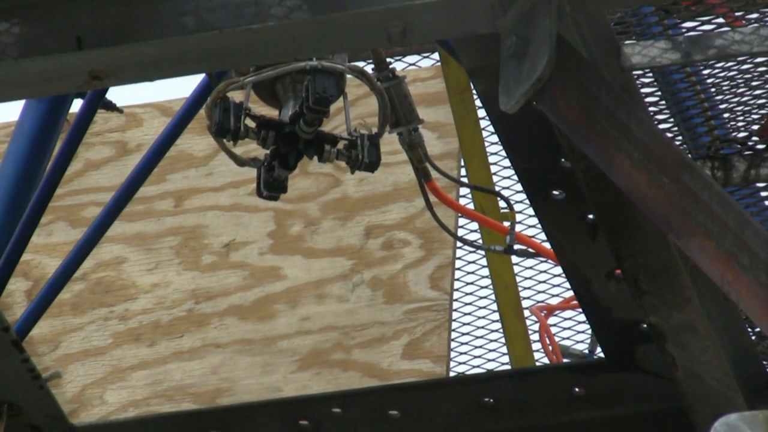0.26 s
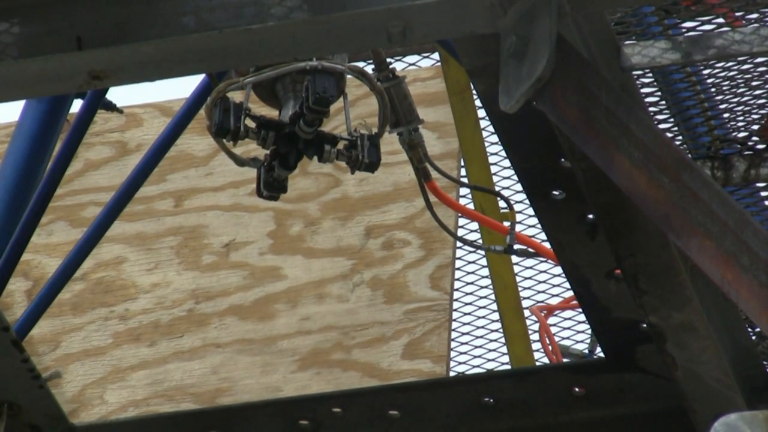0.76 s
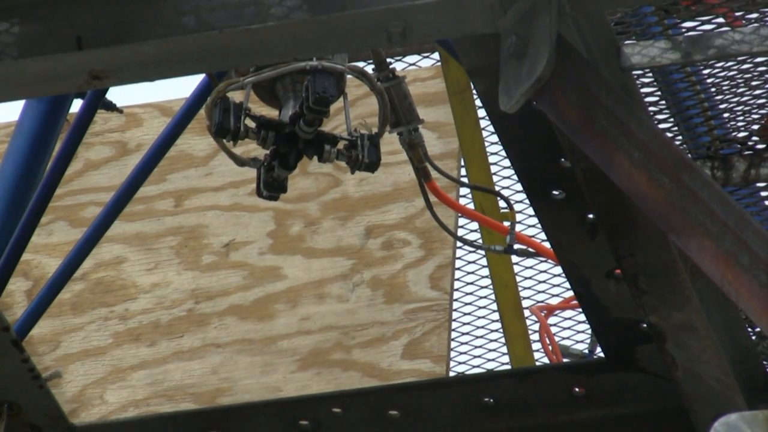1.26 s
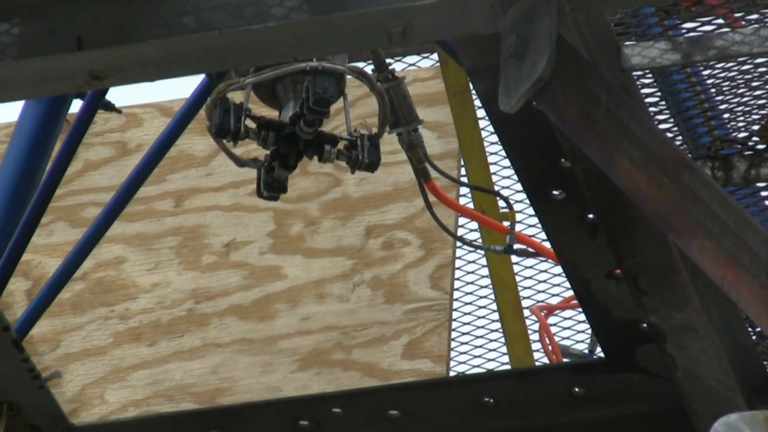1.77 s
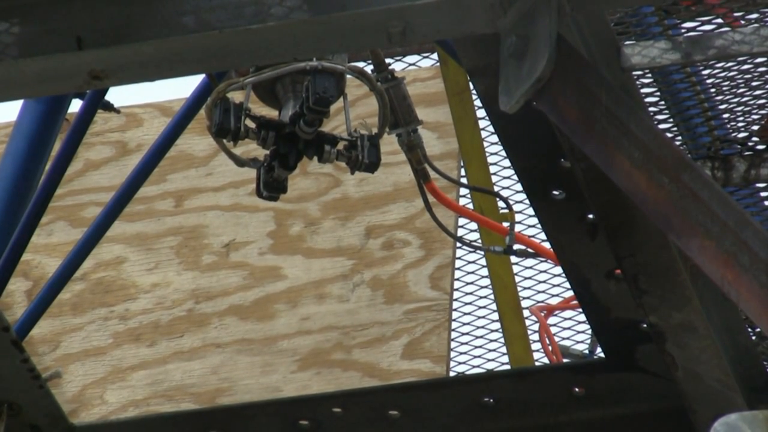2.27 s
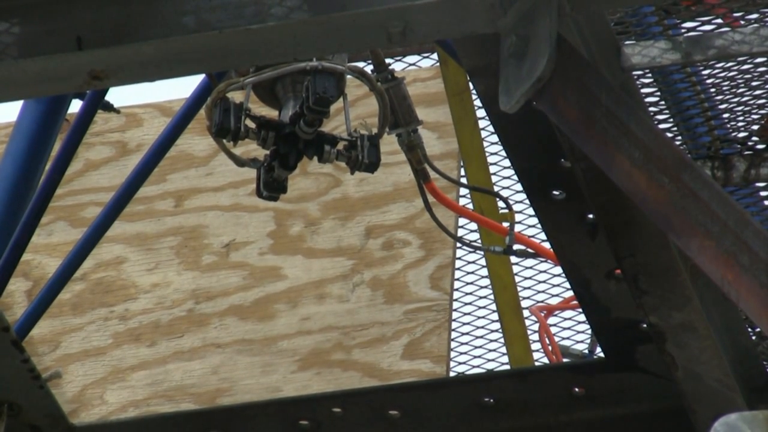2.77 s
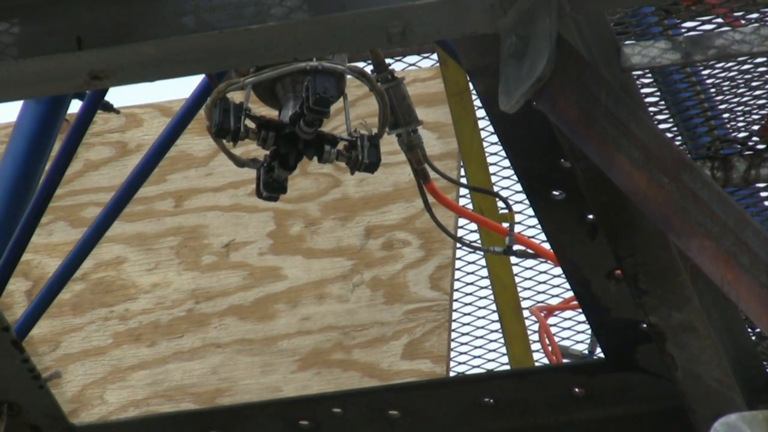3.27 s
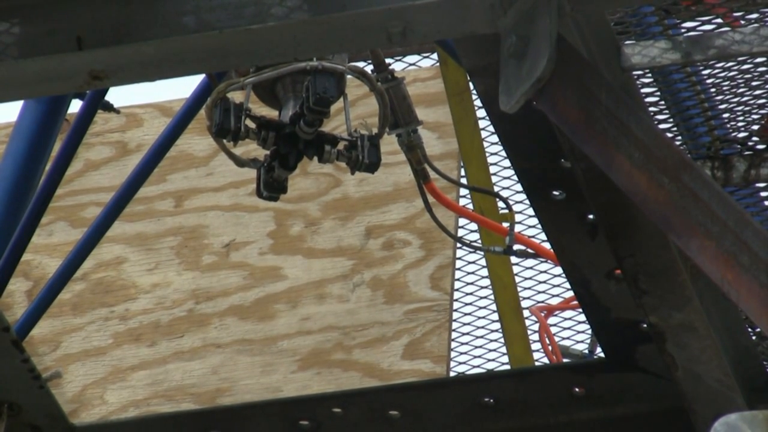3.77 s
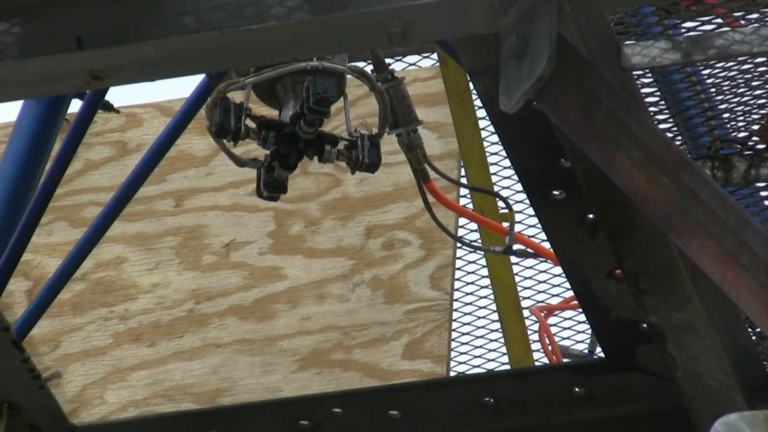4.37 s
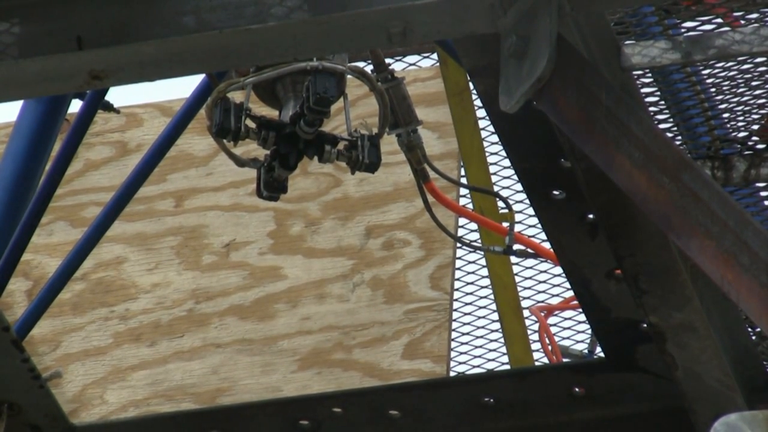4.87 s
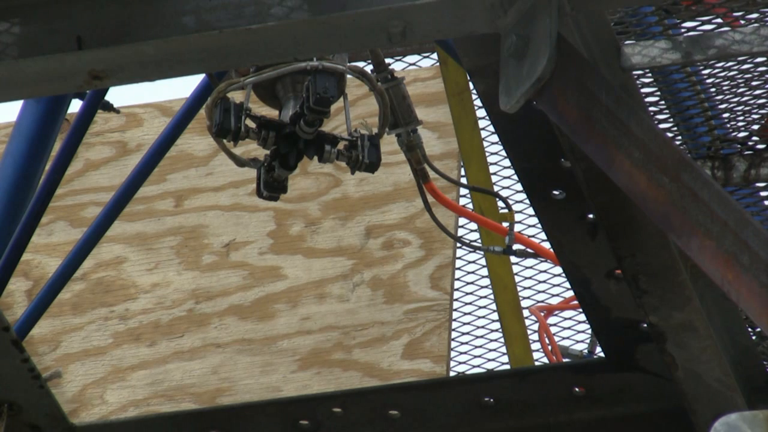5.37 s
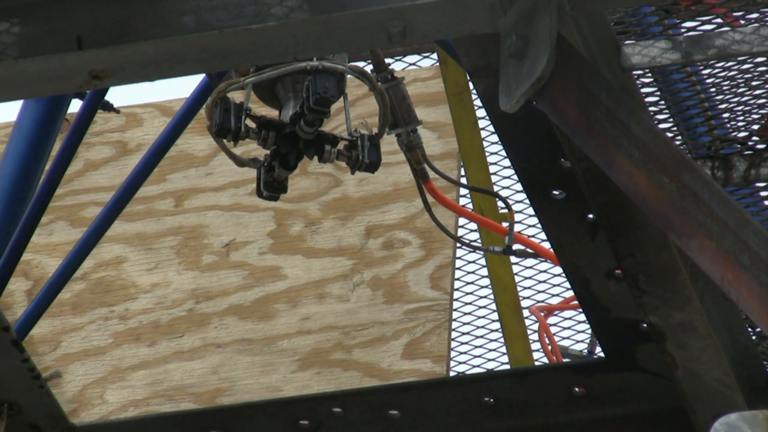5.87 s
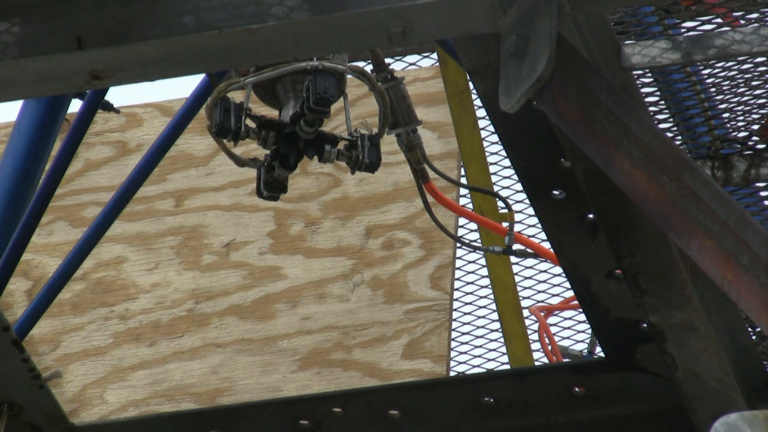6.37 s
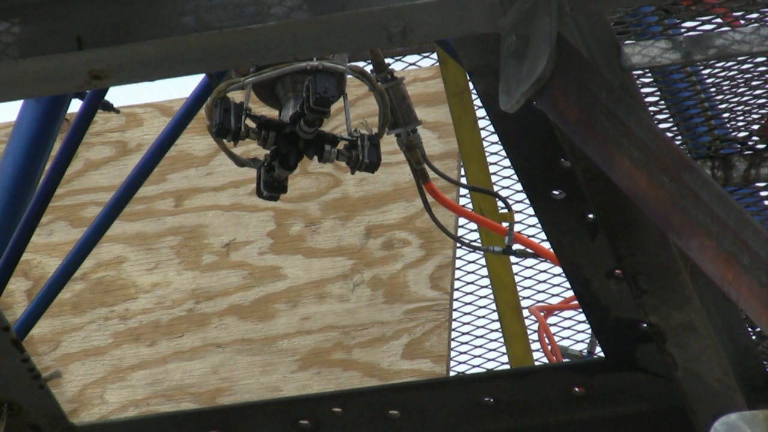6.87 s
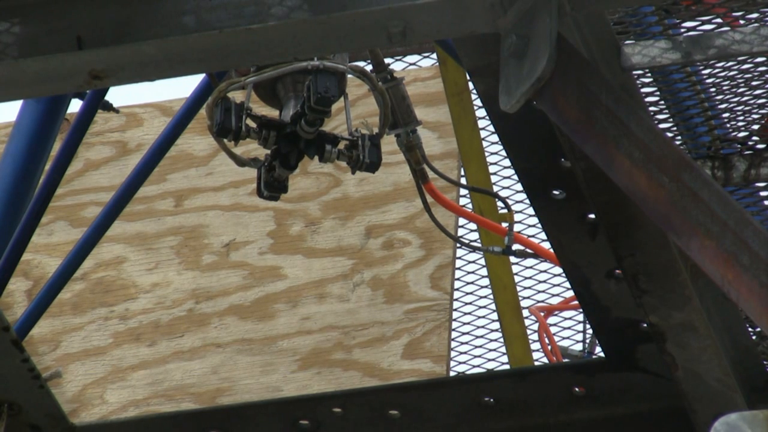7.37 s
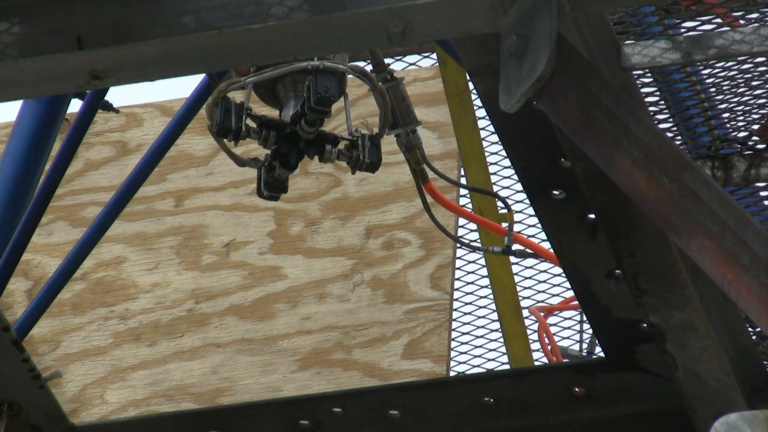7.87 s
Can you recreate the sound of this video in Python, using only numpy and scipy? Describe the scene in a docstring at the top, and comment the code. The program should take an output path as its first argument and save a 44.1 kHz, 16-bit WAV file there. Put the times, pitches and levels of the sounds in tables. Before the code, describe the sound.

A small rocket thruster roars and hisses close by, fades and shuts off, then relights with a pop and a rising screech.

```python
"""A small gas thruster on a steel and plywood stand burns close by and overdrives the microphone amplifier.
After two seconds it runs down, and short bursts of high hiss flicker over the fading roar.
At 5.7 s the valve shuts and the gas left in the line hisses out.
In the pause the frame gives soft valve thumps while mains hum, yard noise and a far hiss come up.
At 7.1 s the jet relights with a pop, and a rising screech joins its roar and shock-cell shriek."""
import sys
import numpy as np
from scipy import signal
from scipy.fft import rfft, irfft, next_fast_len
from scipy.io import wavfile
from scipy.ndimage import uniform_filter1d, map_coordinates

SR = 44100
rng = np.random.default_rng(int(sys.argv[2]) if len(sys.argv) > 2 else 0)


def unload_audio(sound):
    """Save the sound as a 16-bit wav file, at the path given as the first command line argument."""
    columns = np.transpose(np.atleast_2d(sound))
    # keep every value between -1 and 1, then stretch to whole-number steps
    steps = np.round(np.clip(columns, -1, 1) * 32767)
    wavfile.write(sys.argv[1], SR, steps.astype(np.int16))


N = 357648

# Swell of the background. Each row: time in seconds, share of the rise from 0 to 1.
SWELL = [(5.5, 0.03), (5.95, 0.3), (6.3, .55), (6.6, .82), (6.9, 1), (7.12, .85)]
# Outdoor sound at the two ports. Each row: frequency in Hz, left-right coherence.
YARD_COHERENCE = [(60, 0.49), (130, 0.07), (290, 0.5), (640, 0.72), (1410, 0.66), (3100, 0.39),
                  (6820, 0.36), (15000, 0.27)]
# Its balance. Each row: frequency in Hz, left minus right in dB.
YARD_PAN = [(60, -6.5), (110, -6), (200, -9), (380, -9), (700, -10.5), (1290, -8.5), (2380, -3.5),
            (4400, -4), (8120, -2.5), (15000, -1.5)]
# The two burns. Each row: valve opening and shutting times in seconds.
BURNS = [(-1, 5.73), (7.1215, 9)]
# The relight pop: start in seconds, level in dB, frequency in Hz, 60 dB decay time in seconds.
POP = (7.1254, 18, 290, .015)
# Phase between left and right for the jet layers; the left swings well ahead around 8 kHz. Each row: frequency
# in Hz, lead of the left in radians.
JET_LEAD = [(0, 0), (2840, 0.16), (3190, 0.25), (5770, -0.2), (6290, 0.3), (6800, -0.1), (7240, -0.3),
            (7920, 1.3), (8610, 2.0), (9650, 1.1), (10600, 1.1), (12900, 0.076), (15300, -0.054)]
# Response after the amplifier. Each row: frequency in Hz, gain in dB.
MIC_RESPONSE = [(30, -9), (150, -1), (500, -0.5), (4500, -1.5), (6500, -3), (8500, -4.5), (10500, 2),
                (16000, -6.5)]


def amp(db):
    """Amplitude ratio of a level in decibels."""
    return 10 ** (np.asarray(db) / 20)


def unit(x):
    """Normalisation to an rms of 1."""
    return x / np.sqrt(np.mean(x ** 2) + 1e-20)


def along(points, hz):
    """Interpolation of (Hz, value) points on a logarithmic frequency axis."""
    freqs, values = np.transpose(points)
    return np.interp(np.log(hz + 1), np.log(freqs + 1), values)


def envelope(points):
    """Linear interpolation of (seconds, value) points at every sample."""
    return np.interp(np.arange(N) / SR, *np.transpose(points))


def wobble(rate):
    """Slow random modulation: a spline through rate Gaussian knots a second."""
    return map_coordinates(rng.standard_normal(int(N * rate / SR) + 4), [np.arange(N) * rate / SR])


def filtered(x, response):
    """Linear filtering: the spectrum of x times a complex function of frequency."""
    size = next_fast_len(N + SR // 4)
    return irfft(rfft(x, size) * response(np.fft.rfftfreq(size, 1 / SR)), size)[..., :N]


def rush(spectrum, coherence, pan, lead, patchy_db):
    """Partially coherent stereo noise of rms 1, its gain fluctuating in patches of time and frequency."""
    def mid_side(hz):
        angle = np.arccos(np.clip(along(coherence, hz), -1, 1)) / 2
        return np.array([np.cos(angle), np.sin(angle)])

    def ports(hz):
        half = np.array([[.5], [-.5]])
        db = along(spectrum, hz) - along(MIC_RESPONSE, hz) + half * along(pan, hz)
        return amp(db) * np.exp(1j * half * along(lead, hz))

    cells = signal.stft(rng.standard_normal((2, N)), nperseg=512)[2]
    patches = uniform_filter1d(rng.standard_normal(cells.shape[1:]), size=6, axis=0)
    patches = uniform_filter1d(patches, size=12, axis=1)
    pair = signal.istft(cells * amp(patchy_db * unit(patches)), nperseg=512)[1][:, :N]
    mid, side = filtered(pair, mid_side)
    return unit(filtered(np.array([mid + side, mid - side]), ports))


def yard():
    """Ambient noise: a low broadband bed and the modulated tones of a far machine swell together."""
    # Each row: frequency in Hz, relative spectral density in dB.
    spectrum = [(20, -7), (66, -6.5), (178, -6), (314, -10.5), (370, -7), (470, -9.5), (540, -5.5),
                (640, -12.5), (870, -13), (1270, -15), (1700, -18.5), (2500, -29), (5000, -38.5)]
    # Each row: frequency in Hz, level in dB at the top of the swell.
    machine_tones = [(360.7, -60), (522.2, -56), (753.7, -58), (866.7, -60)]
    t = np.arange(N) / SR
    low_db, top_db = -58, -42.5
    noise = rush(spectrum, YARD_COHERENCE, YARD_PAN, lead=[(1000, .1)], patchy_db=1.2)
    machine = sum(amp(db + 3 * wobble(8.3)) * np.sin(2 * np.pi * hz * t + 1.2 * wobble(14))
                  for hz, db in machine_tones)
    return amp(low_db + (top_db - low_db) * envelope(SWELL)) * (noise + machine / amp(top_db))


def far_hiss():
    """Broadband noise: a smooth, distant hiss rises in the pause."""
    # Each row: frequency in Hz, relative spectral density in dB.
    spectrum = [(1200, -25.5), (2200, -4.5), (3800, -4), (4600, 0), (5800, -0.5), (7000, -4.5),
                (9000, -4.5), (16000, -10)]
    # Each row: time in seconds, level in dB.
    rise = [(6.15, -71.5), (6.6, -51), (7.12, -51)]
    noise = rush(spectrum, YARD_COHERENCE, YARD_PAN, lead=[(1000, .1)], patchy_db=.6)
    return amp(envelope(rise)) * noise


def mains_hum():
    """Harmonics: the mains frequency and its octave waver and swell until the relight."""
    # Each row: frequency in Hz, relative level in dB.
    harmonics = [(59.4, 3), (118.8, -13.5)]
    t = np.arange(N) / SR
    low_db, top_db = -59, -31
    hum = sum(amp(db + .8 * wobble(5)) * np.sin(2 * np.pi * hz * t + .3 * wobble(6))
              for hz, db in harmonics)
    before_relight = t < BURNS[1][0]
    return before_relight * amp(low_db + (top_db - low_db) * envelope(SWELL)) * hum * amp([[-4], [2.5]])


def knocks():
    """Damped vibration: valve thumps and the relight pop ring the frame briefly; a noise burst ticks."""
    # Each row: start in seconds, level in dB, frequency in Hz, 60 dB decay time in seconds.
    thumps = [(5.95, -40, 60, .08), (6.125, -28, 137.6, 0.054), (6.26, -25, 100, .06),
              (6.516, -29.5, 100, .05), (6.978, -8, 90.3, .065)]
    # Each row: start in seconds, level in dB.
    ticks = [(6.838, -42.5)]
    out, t = np.zeros(N + SR), np.arange(SR // 4) / SR
    for start, db, hz, t60 in [*thumps, POP]:
        ring = amp(db - 60 * t / t60) * np.sin(2 * np.pi * hz * t)
        attack = 1 - np.exp(-t * hz * 2.5)
        out[round(start * SR):][:len(t)] -= ring * attack
    for start, db in ticks:
        out[round(start * SR):][:len(t)] += amp(db - 60 * t / .008) * rng.standard_normal(len(t))
    return out[:N] * amp([[-3], [2.5]])


def vent():
    """Orifice noise: gas hisses thinly through the shut valve until the line is empty."""
    # Each row: frequency in Hz, relative spectral density in dB.
    spectrum = [(800, -32.5), (1250, -19), (1550, -8), (2100, -11.5), (2700, -18), (3100, -9), (4600, -5.5),
                (5900, -20), (8800, -11.5), (10700, 0), (12800, -9), (13700, -7), (14200, 1.5), (14800, -7),
                (16000, -15.5)]
    # Each row: frequency in Hz, left-right coherence.
    coherence = [(60, -0.35), (130, -0.24), (290, 0.87), (640, 0.89), (1410, 0.74), (3100, 0.66),
                 (6820, 0.3), (15000, 0.32)]
    # Each row: frequency in Hz, phase lead of the left in radians.
    lead = [(1000, -1), (7000, -1), (8500, 1), (15000, 0)]
    t = np.arange(N) / SR
    start_s, empty_s = 5.77, 6.05
    start_db, top_db, rise_db_per_s, cut_db_per_s = -36.5, -29, 42, 950
    level_db = np.minimum(start_db + rise_db_per_s * (t - start_s), top_db)
    level_db -= cut_db_per_s * np.maximum(t - empty_s, 0)
    level = (t > start_s) * amp(level_db + .8 * wobble(25))
    return level * rush(spectrum, coherence, [(1500, -8.5), (12000, -1.0)], lead, patchy_db=2.5)


def treble_bursts():
    """Gated noise: short bursts of high hiss above 9 kHz flicker over the fading roar."""
    # Each row: start in seconds, end in seconds, level in dB.
    bursts = [(2.21, 2.306, -2), (2.44, 2.502, -2.5), (2.71, 3.01, -2.5), (3.15, 3.22, -3.5),
              (3.39, 3.458, -5), (3.56, 3.607, -7), (3.69, 3.762, -8), (3.83, 3.86, -11.5),
              (3.94, 4.08, -13)]
    # Each row: frequency in Hz, relative spectral density in dB.
    burst_spectrum = [(7000, -41.5), (8800, -9.5), (9800, 2.5), (12000, -1.5), (16000, -4.5)]
    t = np.arange(N) / SR
    level = sum(amp(db) * np.clip(np.minimum(t - start, end - t) / .015 + .5, 0, 1)
                for start, end, db in bursts)
    return level * rush(burst_spectrum, [(10000, .8)], [(10000, 1.5)], JET_LEAD, patchy_db=1.2)


def gusts():
    """Wind noise: low puffs of exhaust cross the microphone ports."""
    # Each row: centre in seconds, level in dB, half length in seconds.
    puffs = [(2.294, -4, 0.042), (2.758, -8.5, .015)]
    t = np.arange(N) / SR
    level = sum(amp(db) * np.exp(-((t - centre) / half) ** 2) for centre, db, half in puffs)
    return level * rush([(30, -15), (120, 1), (400, -1.5), (900, -25), (2000, -60)],
                        coherence=[(200, .3)], pan=[(200, -1.5)], lead=[(200, .1)], patchy_db=0.5)


def screech():
    """Narrow-band noise: a fuzzy whistle and a wider skirt above it glide up as the relit jet settles."""
    def band(centre_hz, width_hz):
        phase = 2 * np.pi * np.cumsum(centre_hz) / SR
        return wobble(width_hz) * np.cos(phase) + wobble(width_hz) * np.sin(phase)

    start_s, fade_in_s, start_hz, glide_hz_per_s, growth_db_per_s = 7.3, .15, 2800, 1120, 13.5
    since = np.maximum(np.arange(N) / SR - start_s, 0)
    hz = start_hz + glide_hz_per_s * since
    whistle = band(hz, width_hz=170) + band(hz + 350, width_hz=700)
    level = amp(-24 + growth_db_per_s * since) * np.minimum(since / fade_in_s, 1) ** 2
    return level * whistle * amp([[-1.5], [1.5]])


def stand(x):
    """Reflection and resonance: nearby panels add dull echoes, and the hollows of the stand ring along."""
    # Each row: delay in milliseconds, left and right reflection factors.
    panels = [(2.4, 0.17, 0.18), (2.88, 0.18, 0.26), (3.6, 0.24, 0.11), (3.45, -0.11, -0.11),
              (1, -0.0023, -0.025)]
    # Each row: resonance in Hz, bandwidth in Hz, boost in dB.
    hollows = [(340, 92, 4), (633, 57, 9.5), (1134, 110, 3), (1468, 70, 5), (1830, 61, 3), (2117, 110, 2.5)]
    delay_ms, left, right = np.transpose(panels)

    def response(hz):
        delays = np.exp(-2j * np.pi * np.outer(delay_ms / 1000, hz))
        echoes = np.array([left, right]) @ delays / (1 + (hz / 6500) ** 4)
        ringing = sum((amp(db) - 1) * 1j * hz * width / (centre ** 2 - hz ** 2 + 1j * hz * width)
                      for centre, width, db in hollows)
        return (1 + echoes) * (1 + ringing)

    return filtered(x, response)


def valve_gate(open_s, shut_s):
    """Exponential rise and decay: the jet starts and stops fast, then lingers as the chamber empties."""
    t = np.arange(N) / SR
    open_db_per_s, shut_db_per_s, linger_db, linger_db_per_s = 11000, 477, -31, 27.5
    since_shut = np.maximum(t - shut_s, 0)
    opening_db = np.minimum(open_db_per_s * (t - open_s) - 59.5, 0)
    closing_db = np.maximum(-shut_db_per_s * since_shut, linger_db - linger_db_per_s * since_shut)
    return amp(opening_db + closing_db)


def sagging(gates, sags):
    """Exponential drift: each burn holds its level, then sags, or builds if the rate is negative."""
    t = np.arange(N) / SR
    return sum(gate * amp(db - db_per_s * np.maximum(t - start, 0))
               for gate, (db, start, db_per_s) in zip(gates, sags))


def shriek(gates, surge_db):
    """Shock-associated noise: the shock cells of the jet radiate a broad treble peak."""
    # Each row: frequency in Hz, relative spectral density in dB.
    spectrum = [(1500, -46), (3000, -21), (3700, -8), (4200, -3.5), (4700, -0.5), (5500, -5.5),
                (6400, -6.5), (7500, -17), (10000, -15), (16000, -18)]
    # Each row: held level of a burn in dB, start of its sag in seconds, sag in dB per second.
    sags = [(-5, 2.05, 4), (-2, 7.15, -5)]
    level = np.minimum(sagging(gates, sags), amp(1)) * amp(surge_db + .5 * wobble(20))
    return level * rush(spectrum, coherence=[(3000, 1.0), (8000, 0.69)], pan=[(4000, -6.0)],
                        lead=JET_LEAD, patchy_db=1.5)


def blast(gates):
    """Incoherent pressure fluctuation: the blast shakes each port on its own, most of all in the bass."""
    # Each row: frequency in Hz, relative spectral density in dB.
    spectrum = [(15, -45), (25, -11), (497, 1.5), (1580, -1.5), (2070, 0), (3840, -2), (8170, -8.5),
                (10400, -12.5), (14400, -16), (15600, -12.5)]
    # Each row: held level of a burn in dB, start of its sag in seconds, sag in dB per second.
    sags = [(4.5, 2.19, 15.8), (-15, 7.2, 5)]
    coherence = [(100, .1), (1000, 0.21), (5000, 0.61), (9000, .75), (15000, .75)]
    pan = [(100, -1.5), (1000, -0.083), (12000, .6)]
    level = sagging(gates, sags) * amp(0.52 * wobble(12))
    return level * rush(spectrum, coherence, pan, lead=[(1000, 0.13)], patchy_db=1.0)


def roar(gates, surge_db):
    """Turbulent mixing: the jet shears against still air and radiates broadband noise."""
    # Each row: frequency in Hz, relative spectral density in dB.
    spectrum = [(35, -74), (60, -24.5), (336, -9.5), (522, -13), (659, -6.5), (871, -3.5), (978, -0.5),
                (1450, -0.5), (1970, -2.5), (2160, -1.5), (2600, -1.5), (4340, 1), (7760, -11),
                (10000, -11), (15600, -14.5)]
    # Each row: frequency in Hz, left-right coherence.
    coherence = [(60, 0.21), (130, 0.64), (290, 0.81), (640, 0.99), (1410, 0.87), (3100, 1), (6820, 0.67),
                 (15000, 0.55)]
    # Each row: frequency in Hz, left minus right in dB.
    pan = [(60, -10.5), (110, -11.5), (200, -17.5), (380, -8.5), (700, -8.5), (1290, -5), (2380, -7),
           (4400, -4.5), (8120, -3.5), (15000, 1)]
    # Each row: time in seconds, level in dB with the valve open.
    levels = [(0, 2.5), (2.2, 2), (2.35, -1), (2.5, 8), (2.8, 2.5), (3.5, -1), (4.5, -7), (5.4, -13.5),
              (5.73, -16.5), (7.12, -8), (7.3, -5), (7.42, -7.5), (7.5, -13.5), (7.7, -15.5), (7.9, -11),
              (8.11, -15)]
    level = sum(gates) * amp(envelope(levels) + surge_db)
    return level * rush(spectrum, coherence, pan, JET_LEAD, patchy_db=1.29)


def jet():
    """Superposition: roar, shriek and blast follow one valve; roar and blast overshoot at the relight."""
    t = np.arange(N) / SR
    gates = [valve_gate(*burn) for burn in BURNS]
    kick_db, kick_s = 18, .008
    kick = amp(kick_db * np.exp(-np.abs(t - POP[0]) / kick_s))
    surge_db = .5 * wobble(7)
    mixing = kick * roar(gates, surge_db)
    shock = shriek(gates, surge_db)
    # The shriek beams, so only part of it meets the stand.
    return stand(mixing + 0.64 * shock) + .4 * shock + kick * blast(gates)


def scene():
    """Superposition: all the layers add ahead of the amplifier."""
    foreground = jet() + screech() + treble_bursts() + gusts() + vent()
    return foreground + mains_hum() + yard() + far_hiss() + knocks()


def record(dry):
    """Saturation: the amplifier flattens the peaks; filters colour and smear them, and they clip again."""
    def all_pass(hz):
        return np.exp(-2j * (np.arctan((hz - 7500) / 2500) - np.arctan(150 / (hz + 1))))

    ceiling, top_hz = 0.66, 15741
    flat = dry / (1 + np.abs(dry / ceiling) ** 4.39) ** (1 / 4.54)
    coloured = filtered(flat, lambda hz: amp(along(MIC_RESPONSE, hz) + 1) * all_pass(hz) / all_pass(1000))
    clipped = np.clip(coloured, -1, 1)
    return filtered(clipped, lambda hz: np.clip((top_hz + 60 - hz) / 160, 0, 1) ** 2)


dry = scene()
out = record(dry)
unload_audio(out)
```